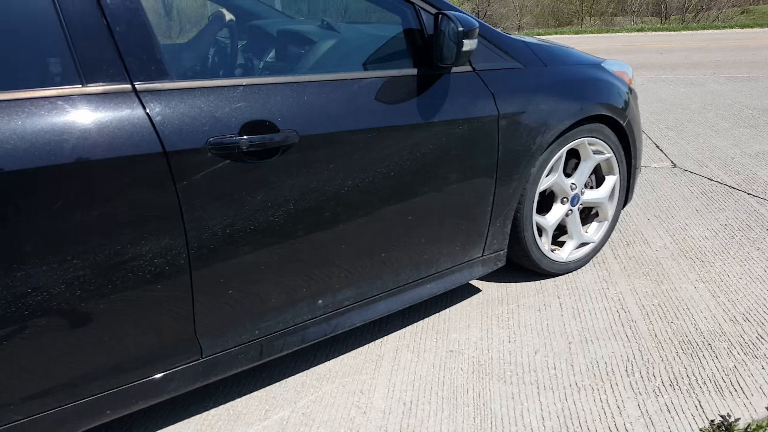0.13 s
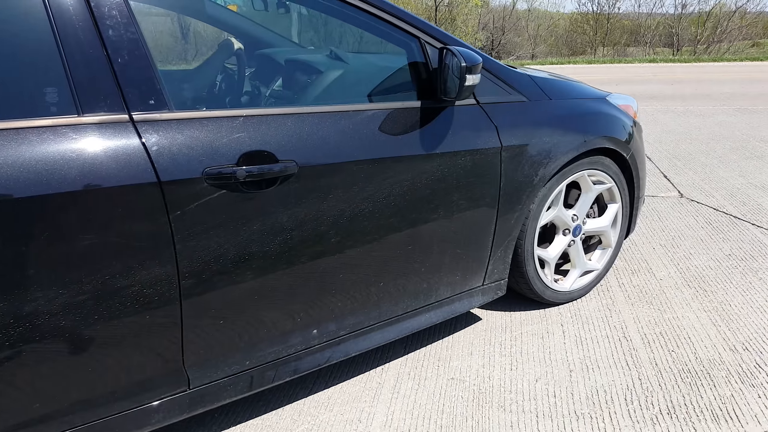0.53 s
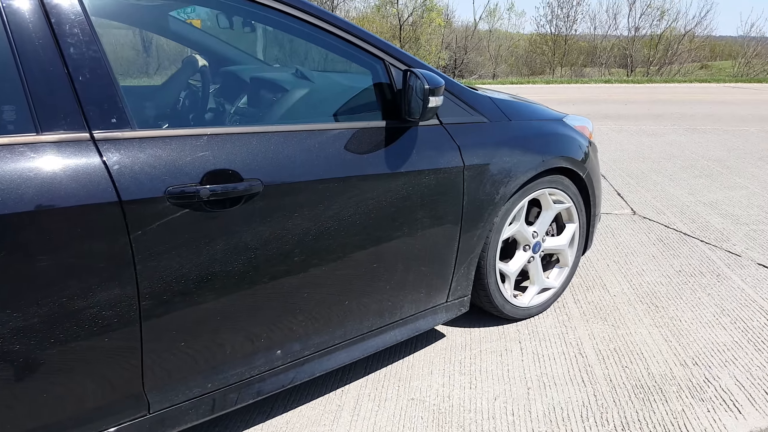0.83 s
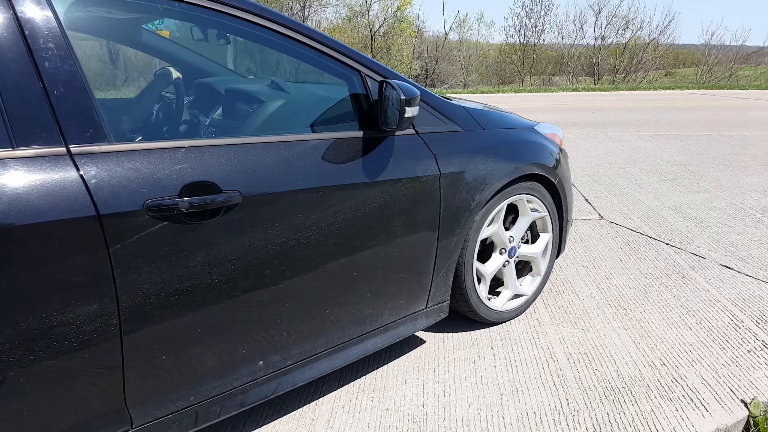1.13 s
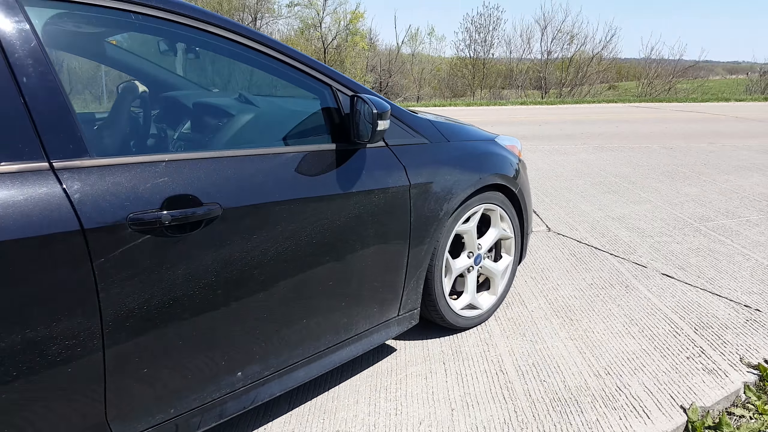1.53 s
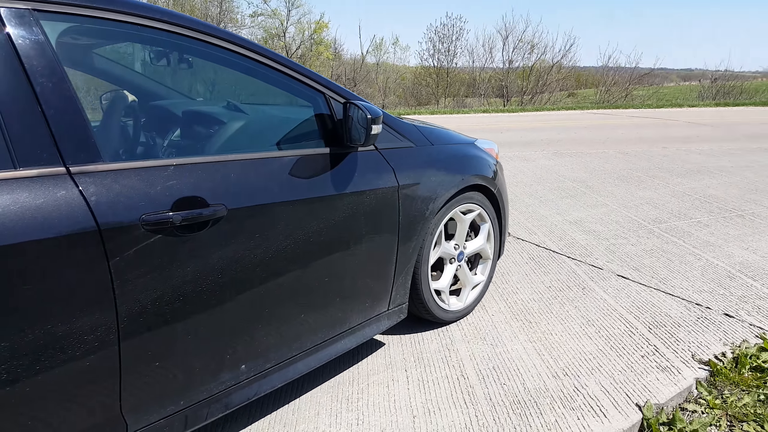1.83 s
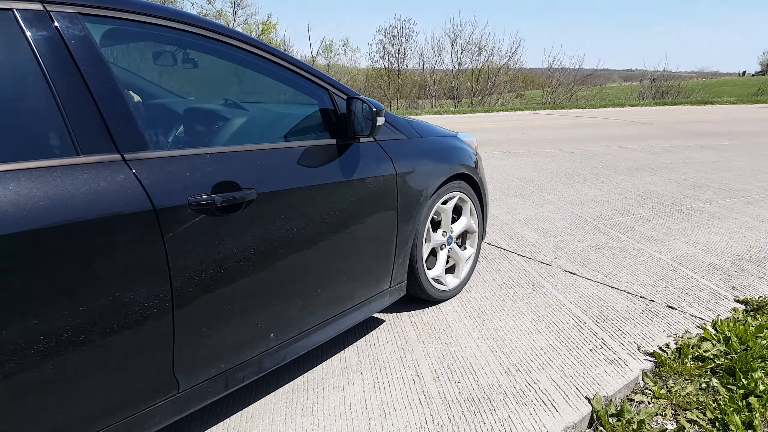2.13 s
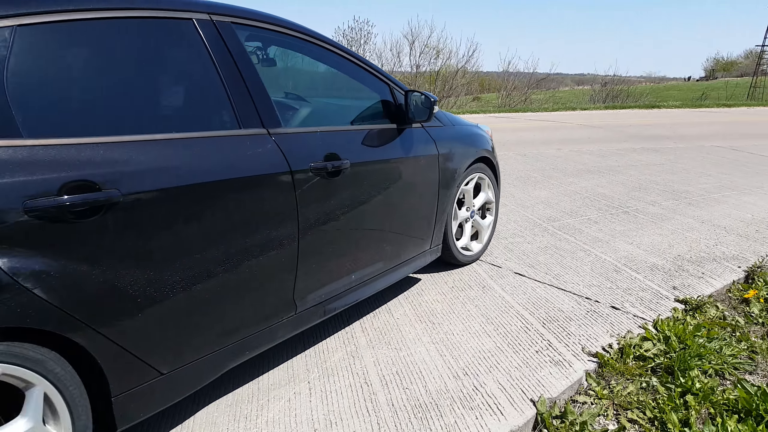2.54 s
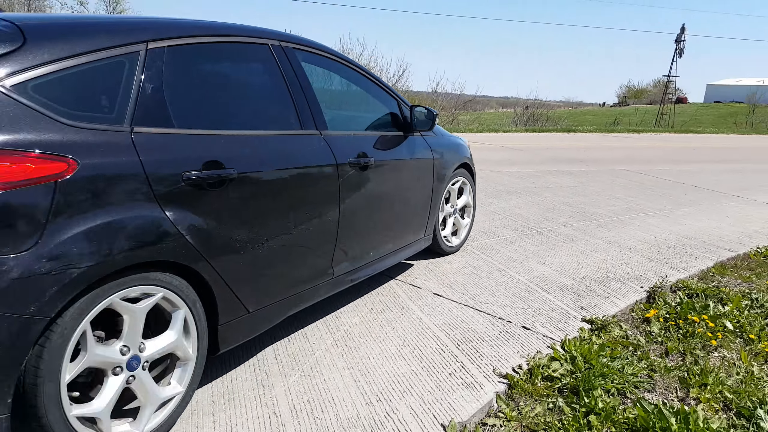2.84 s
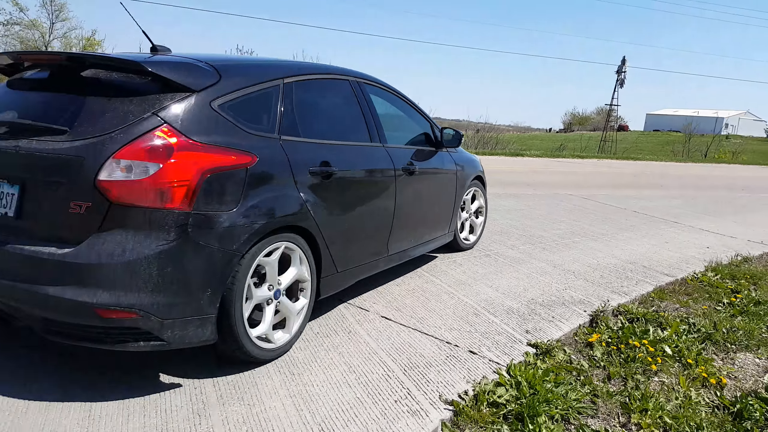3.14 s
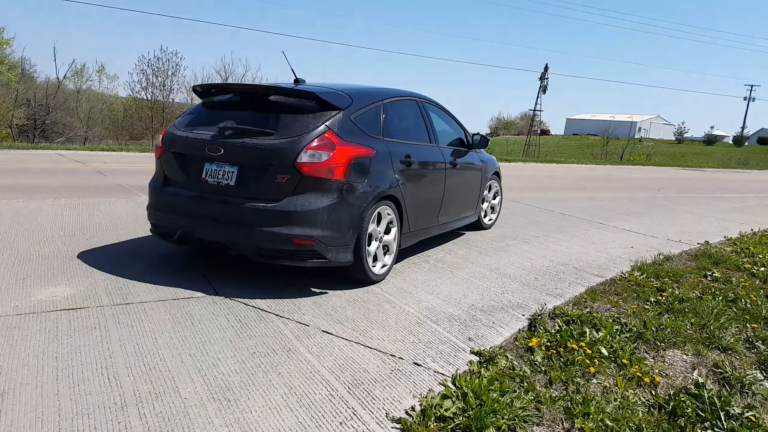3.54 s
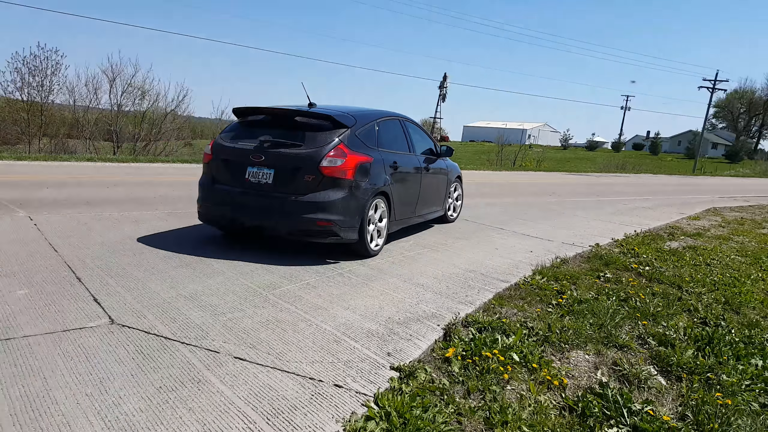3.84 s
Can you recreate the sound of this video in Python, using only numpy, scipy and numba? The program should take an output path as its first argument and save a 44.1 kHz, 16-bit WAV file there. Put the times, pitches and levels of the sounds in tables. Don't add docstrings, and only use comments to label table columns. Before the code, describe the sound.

Beside an open road, close up in stereo: after brief silence, a four-cylinder car's vented air rushes and cuts off, the engine drops low, then its exhaust booms and rasps as tyres roll away over grit.

```python
import sys
import numpy as np
from scipy import signal
from scipy.fft import rfft, irfft
from scipy.io import wavfile
from scipy.ndimage import uniform_filter1d, map_coordinates
from numba import njit

SR = 44100
rng = np.random.default_rng(int(sys.argv[2]) if len(sys.argv) > 2 else 0)


def boost(x):
    u = np.asarray(x, float) / 20
    return 10 ** u


def generate_wav(sig):
    pcm = np.round(np.clip(np.atleast_2d(sig).T, -1, 1) * 32767).astype(np.int16)
    wavfile.write(sys.argv[1], SR, pcm)


N = 176400
T = np.arange(N) / SR
STARTS_S, SWELL_S = 0.405, 0.12

# time in seconds, firing rate in Hz, then levels in dB of the boom,
# the second order, the bark of higher orders and the rasp.
ENGINE = [(0.41, 103.7, -20, -31, -29, -12), (0.44, 104.5, -30, -40, -31.5, -42),
          (0.61, 94.2, -30.5, -57, -63, -50), (0.76, 96.78, -20, -46, -65, -45),
          (0.96, 78.84, -18, -45, -47, -42), (1.03, 78, -25.5, -44, -36.5, -45),
          (1.2, 71.2, -23, -48, -51, -43.5), (1.4, 64.9, -24.5, -32, -37.5, -53),
          (1.51, 61.5, -32, -37.5, -39.5, -49), (1.76, 54.46, -25.5, -27.5, -39, -36),
          (2.0, 61.6, -20, -24.5, -32.5, -29.5), (2.2, 58.75, -19.5, -23, -32.5, -29),
          (2.51, 51.8, -16.5, -18, -29.5, -34), (2.99, 56.02, -12.5, -19, -25, -35.5),
          (3.3, 53.7, -14.5, -17, -26.5, -37.5), (3.47, 62.28, -16, -24.5, -24.5, -27),
          (3.87, 77.35, -16, -19.5, -26, -22.5), (4.0, 80, -18, -17, -23, -20)]
# frequency in Hz, level of an order in dB.
PIPE = [(150, 4), (220, 0.5), (280, -4.5), (340, -5), (400, -10.5), (460, -11), (560, -34.5), (800, -27)]
# centre in Hz, width in Hz, level in dB.
TAILPIPE_RINGS = [(661, 107, 15), (787.7, 70, 5), (1030, 250, -28)]
# centre in Hz, width in Hz, level in dB.
SILENCER_RINGS = [(580, 130, 0)]
CYLINDERS_DB = [1, -1.9, 1, -2.9]
# time in seconds, level in dB, top edge of the hiss in Hz.
VENT = [
    (.41, -90, 14900),
    (.45, -35, 14950),
    (.48, -26.5, 15600),
    (.65, -17.5, 14000),
    (1.05, -18, 7400),
    (1.45, -20, 5556),
    (1.56, -24, 5400),
    (1.815, -28.5, 4643),
    (1.83, -66, 4516),
]
# frequency in Hz, level in dB per Hz.
VENT_AIR = [(350, -38), (600, -6), (832, -0.5), (1060, -9.5), (1300, 2), (4700, 4), (5100, -2.5),
            (14000, 3.5), (15600, -3)]
# centre in Hz, width in Hz, level in dB.
VENT_DUCT = [(1425, 15, 0.5), (2314, 34, 12), (3590, 97, -8), (3530, 540, -1), (4150, 23, 10),
             (4320, 38, -35.5), (5174, 45, 15), (5670, 97, 7.5), (6190, 75, 3.5), (6970, 330, 2)]
# frequency in Hz, level in dB per Hz.
BAY_COLOUR = [(530, -25), (900, -16), (1520, -5.5), (1730, -4), (2200, -4), (4250, -18.5), (11000, -28),
              (13700, -27.5), (15600, -42)]
# centre in Hz, width in Hz, level in dB.
BAY_RINGS = [(1740, 130, 0), (5970, 250, -13), (7000, 200, -19), (10200, 350, -18), (13400, 1100, -17)]
# frequency in Hz, level in dB per Hz.
TYRE_COLOUR = [(440, 2), (750, -0.5), (1070, -3), (1280, -7.5), (1990, -3.5), (2880, -15), (12200, -34),
               (13200, -40), (15600, -60)]
# time in seconds, peak in dB.
GRIT = [(2.8968, -34.5), (3.1023, -31.5), (3.1323, -37), (3.1812, -33), (3.3014, -38), (3.5389, -34),
        (3.9294, -38)]
# time in seconds, level in dB.
GUST = [(.4, -40), (.62, -33), (.85, -30), (1.15, -34), (1.5, -40), (2.1, -34), (2.7, -31), (3.3, -32),
        (4, -36)]
# frequency in Hz, level in dB per Hz.
WIND_COLOUR = [(25, -9), (60, -1.5), (130, -2.5), (250, 2), (450, -13), (900, -37)]
# frequency in Hz, left over right in dB.
LEFT_LEAN = [(60, .5), (300, 0), (600, 1), (1100, 5), (2200, 3.3), (4500, 3.5), (8000, -.5), (12000, 3)]
# time in seconds, lateness of the left in seconds.
EXHAUST_LAG = [(.4, .0001), (1.8, 0), (2.7, -.0004), (3.3, -.0004), (4, 0)]


def curve(table, axis):
    rows = np.array(table, float)
    return np.interp(T, rows[:, 0], rows[:, axis])


def on_log_hz(hz, points):
    rows = np.array(points, float)
    return np.interp(np.log(hz), np.log(rows[:, 0]), rows[:, 1])


def unit(x):
    return x / np.sqrt(np.mean(x ** 2))


@njit
def svf(x, hz, k):
    y, b, l = np.empty((3, len(x))), 0., 0.
    for i in range(len(x)):
        g = np.tan(np.pi * hz[i] / SR)
        v = (b + g * (x[i] - l)) / (1 + g * (g + k))
        y[0, i] = l + g * v
        y[1, i] = k * v
        y[2, i] = x[i] - k * v - y[0, i]
        b, l = 2 * v - b, l + 2 * g * v
    return y


def steady(hz):
    return np.full(N, min(float(hz), 0.45 * SR))


def rings(x, peaks):
    return sum(boost(db) * svf(x, steady(hz), width / hz)[1] for hz, width, db in peaks)


def walk(rate):
    hold = int(SR / rate)
    steps = np.repeat(rng.standard_normal(N // hold + 1), hold)
    return 1.2 * uniform_filter1d(uniform_filter1d(steps, hold), hold)[:N]


def white_pair():
    f = np.fft.rfftfreq(N, 1 / SR)
    apart = f / np.hypot(f, 2300)
    side = np.array([[1], [-1]])
    mid, *own = rfft(rng.standard_normal((3, N)))
    shared = np.sqrt(1 - apart ** 2) * mid * np.exp(-1j * np.pi * f * 0.00015 * side)
    return irfft(shared + apart * np.array(own), N)


def colour(x, points):
    f = np.fft.rfftfreq(N, 1 / SR) + 1
    below = np.maximum(np.log2(points[0][0] / f), 0)
    return unit(irfft(rfft(x) * boost(on_log_hz(f, points) - 18 * below), N))


def wind():
    return colour(white_pair(), WIND_COLOUR) * boost(curve(GUST, axis=1) + 2.2 * walk(9))


def tyres():
    speed = np.clip((T - 0.82) / 2.43, 0, 1)
    roll = colour(white_pair(), TYRE_COLOUR) * speed * boost(-30 + 0.8 * walk(14))
    grit_hz, grit_width_hz, decay_s = 5500, 8000, 0.0035
    burst = sum(boost(db + 2) * (T >= s) * np.exp(-np.maximum(T - s, 0) / decay_s) for s, db in GRIT)
    noise = rng.standard_normal((2, N))
    snap = np.array([svf(n, steady(grit_hz), grit_width_hz / grit_hz)[1] for n in noise])
    return roll + burst * unit(snap)


def engine_bay():
    level_db, fade_db_per_s, leaves_s = -30.5, 10.5, 2.25
    noise = white_pair()
    ringing = unit(np.array([rings(n, BAY_RINGS) for n in noise]))
    whir = unit(colour(noise, BAY_COLOUR) + boost(-5) * ringing)
    swell = np.clip((T - STARTS_S) / SWELL_S, 0, 1) ** 2
    return whir * swell * boost(level_db - fade_db_per_s * np.maximum(T - leaves_s, 0) + 0.66 * walk(6.7))


def vent():
    noise = white_pair()
    duct = unit(np.array([rings(n, VENT_DUCT) for n in noise]))
    air = colour(noise, VENT_AIR) + boost(-8) * duct
    top = np.minimum(curve(VENT, axis=2), 0.45 * SR)
    dulled = np.array([svf(a, top, 2.13)[0] for a in air])
    return dulled * boost(curve(VENT, axis=1) + 0.93 * walk(13.33))


def exhaust_tones(turns, hz, size_db, behind):
    def tone(order, lead_rad):
        return np.sqrt(2) * np.cos(2 * np.pi * order * turns + lead_rad)

    turned = 0.8 * behind
    boom = tone(1, 2.6 - turned / 2) * boost(curve(ENGINE, axis=2) + 0.5 * walk(36))
    second = tone(2, 0.6 + turned) * boost(curve(ENGINE, axis=3) + size_db / 2)
    bark = sum(tone(k, 1.4) * boost(on_log_hz(k * hz, PIPE) + 1.2 * walk(19)) for k in range(3, 12))
    return boom + second + bark * boost(curve(ENGINE, axis=4) + size_db)


def exhaust_rasp(turns, hz, fired, scatter, behind):
    kick = np.zeros(N)
    kick[fired] = -boost(3 * scatter) / np.sqrt(hz[fired])
    puff = np.exp(-(turns % 1) / 0.45) * rng.standard_normal(N)
    kick = unit(kick) + boost(-3) * unit(puff)
    silencer = unit(rings(rings(kick, SILENCER_RINGS), SILENCER_RINGS))
    rasp = (1 - behind) * silencer + behind * unit(rings(kick, TAILPIPE_RINGS))
    for _ in range(2):
        rasp = svf(rasp, steady(1150), 1.18)[0]
        rasp = svf(rasp, steady(420), 1.595)[2]
    rasp = np.roll(rasp, -int(0.0008 * SR))
    jet = unit(svf(rng.standard_normal(N), steady(2454), 1.0)[1])
    swell = np.clip((T - STARTS_S) / SWELL_S, 0, 1)
    return (rasp + boost(-27.5) * behind * jet) * boost(curve(ENGINE, axis=5)) * swell


def engine():
    hz = curve(ENGINE, axis=1)
    turns = np.cumsum(hz * (1 + 0.006 * walk(40))) / SR
    fired = np.flatnonzero(np.diff(np.floor(turns)) > 0)
    chance = rng.standard_normal((N // 100, 2))[:len(fired)]
    firing_db = 0.9 * chance[:, 0] + np.resize(CYLINDERS_DB, len(fired))
    size_db = np.interp(np.arange(N), fired, firing_db)
    behind = 1 / (1 + np.exp((3.6 - T) / 0.0098))
    tones = exhaust_tones(turns, hz, size_db, behind)
    return tones, exhaust_rasp(turns, hz, fired, chance[:, 1], behind)


def exhaust():
    tones, rasp = engine()
    lag = curve(EXHAUST_LAG, axis=1) * SR
    direct = np.array([map_coordinates(tones + rasp, [np.arange(N) - side * lag / 2], order=1, mode="nearest")
                       for side in (1, -1)])
    road_echo = np.array([np.roll(rasp, 90), -np.roll(rasp, 140)])
    return direct + 0.3 * road_echo


def scene():
    return wind() + tyres() + engine_bay() + vent() + exhaust()


def roll_off(x):
    return signal.sosfilt(signal.butter(12, 15740, fs=SR, output="sos"), x)


def record(dry):
    f = np.fft.rfftfreq(N, 1 / SR) + 1
    lean_db = on_log_hz(f, LEFT_LEAN) * np.array([[1], [-1]]) / 2
    leaned = irfft(rfft(dry) * boost(lean_db), N)
    fade = np.clip((T - STARTS_S) / 0.05, 0, 1)
    mix = np.tanh(leaned * fade * 0.99) / 0.81 + 0.00035
    return roll_off(mix)


dry = scene()
out = record(dry)
generate_wav(out)
```